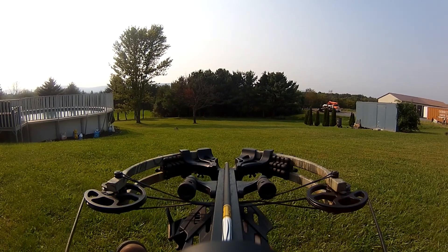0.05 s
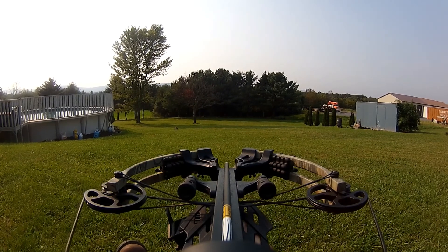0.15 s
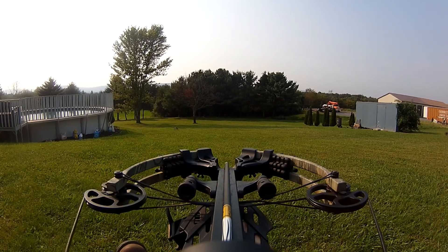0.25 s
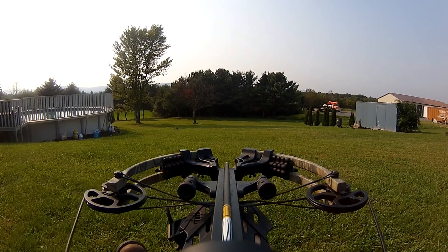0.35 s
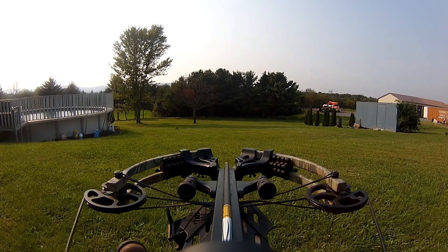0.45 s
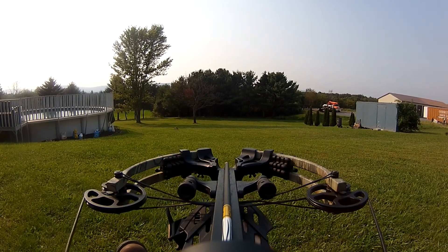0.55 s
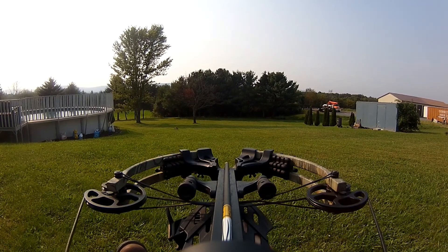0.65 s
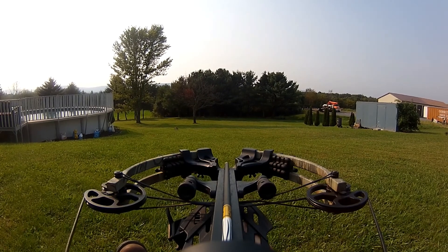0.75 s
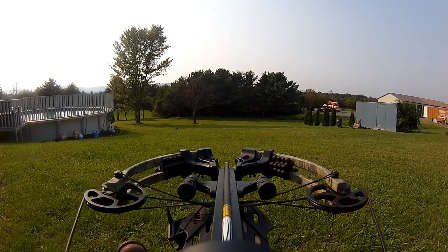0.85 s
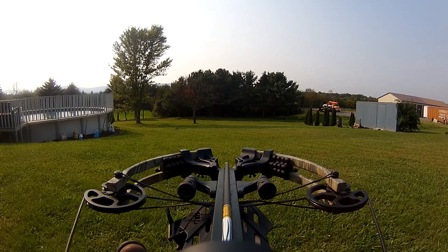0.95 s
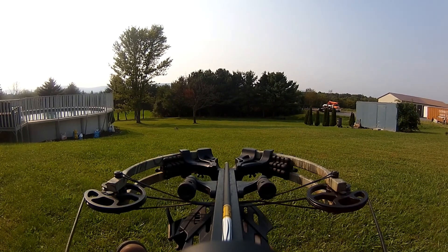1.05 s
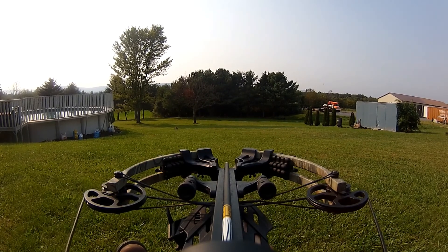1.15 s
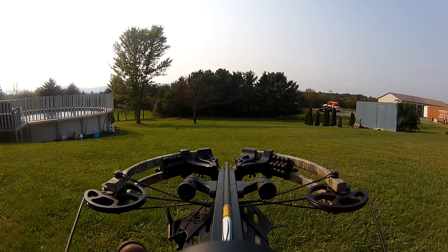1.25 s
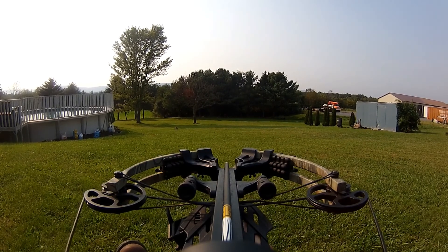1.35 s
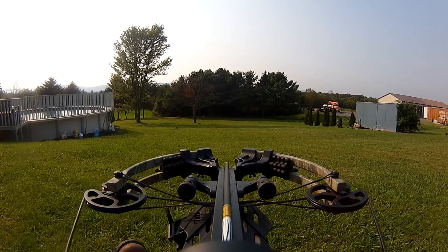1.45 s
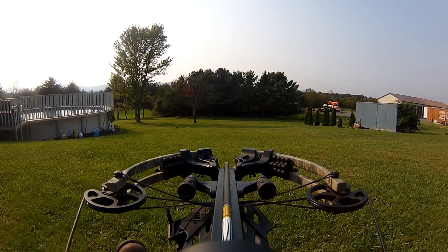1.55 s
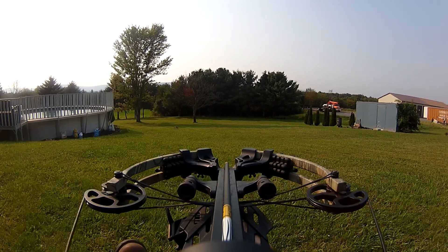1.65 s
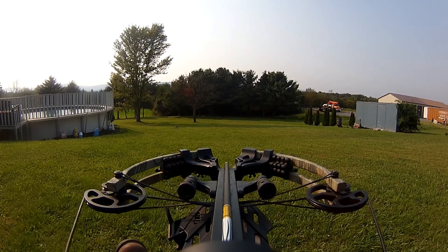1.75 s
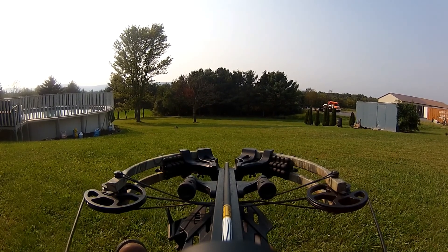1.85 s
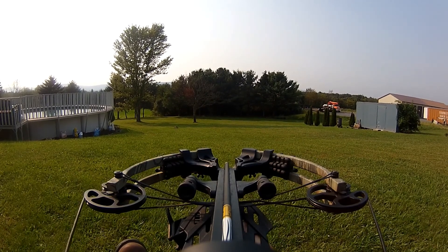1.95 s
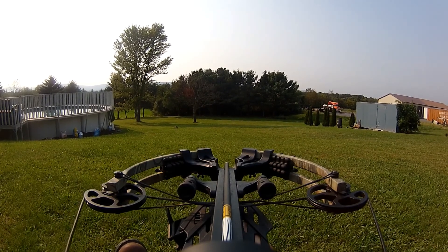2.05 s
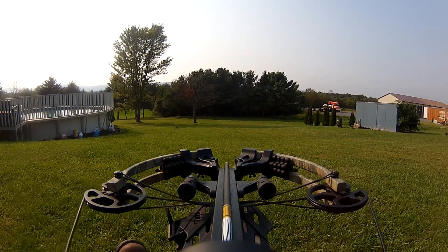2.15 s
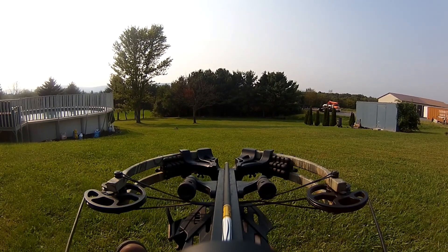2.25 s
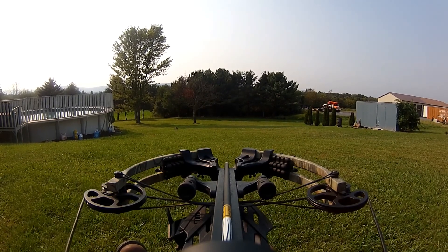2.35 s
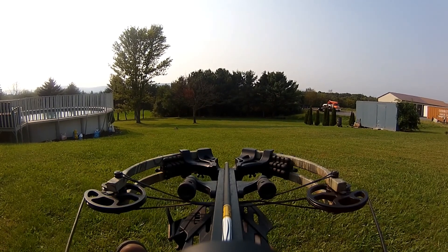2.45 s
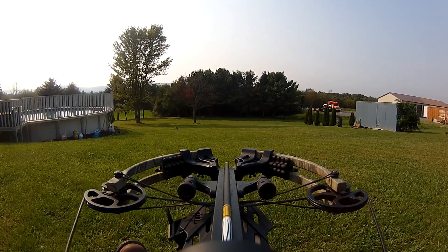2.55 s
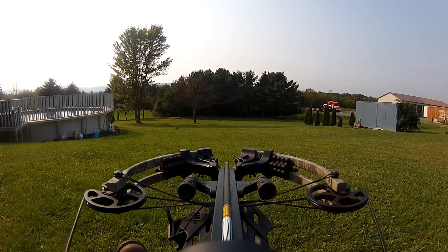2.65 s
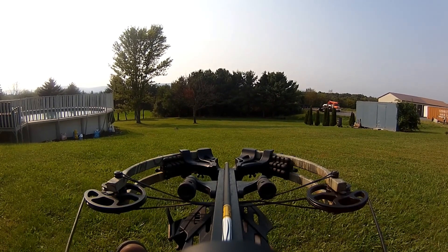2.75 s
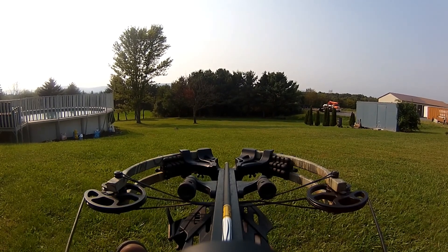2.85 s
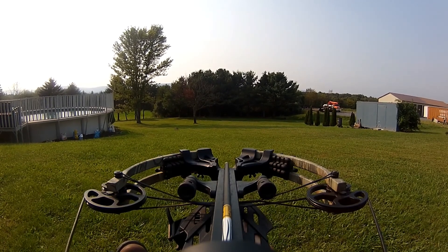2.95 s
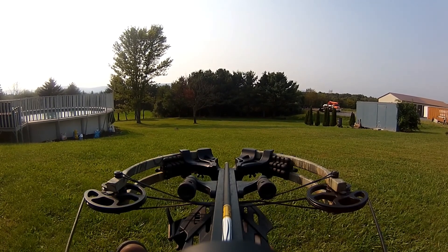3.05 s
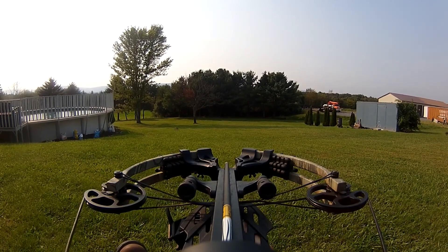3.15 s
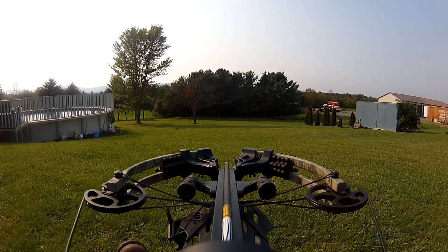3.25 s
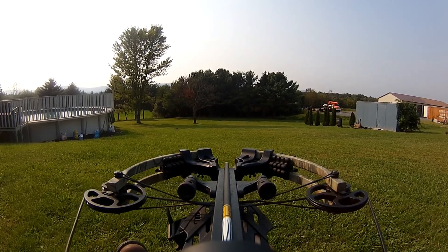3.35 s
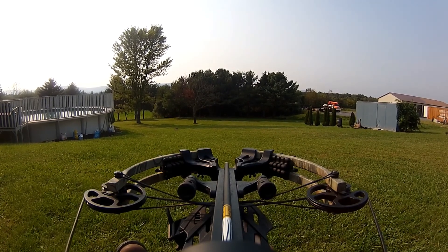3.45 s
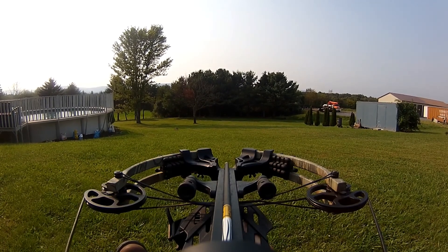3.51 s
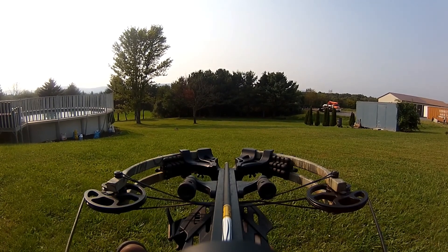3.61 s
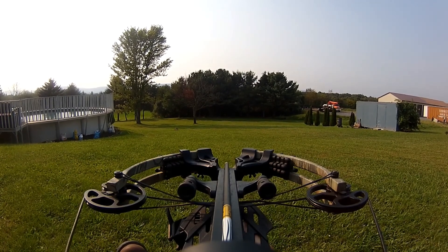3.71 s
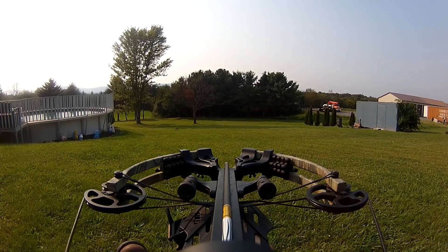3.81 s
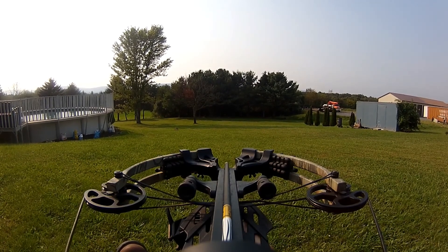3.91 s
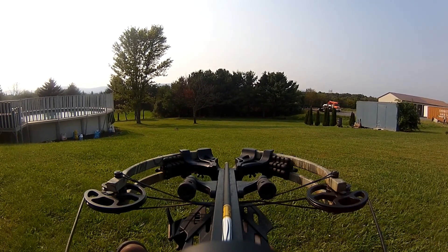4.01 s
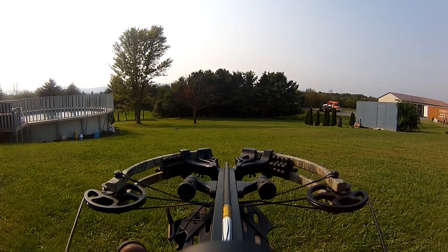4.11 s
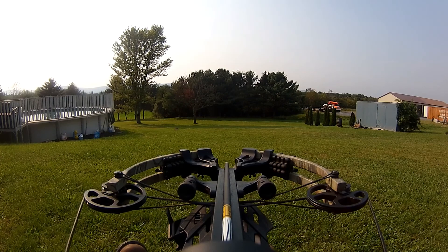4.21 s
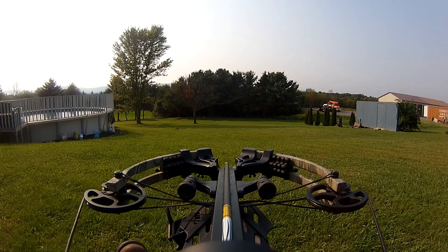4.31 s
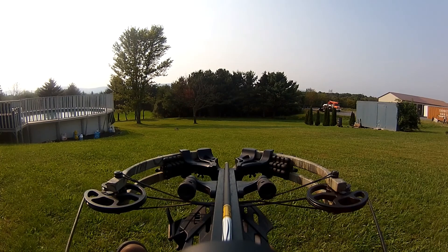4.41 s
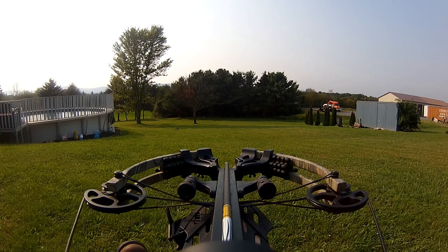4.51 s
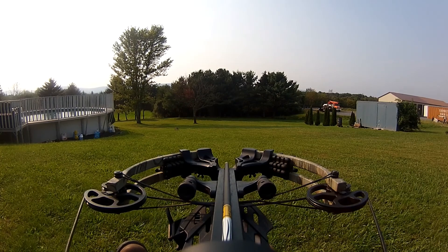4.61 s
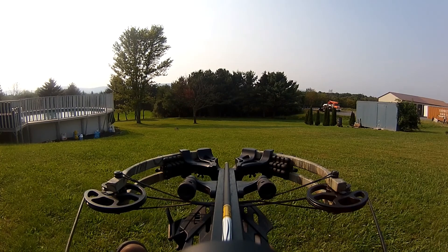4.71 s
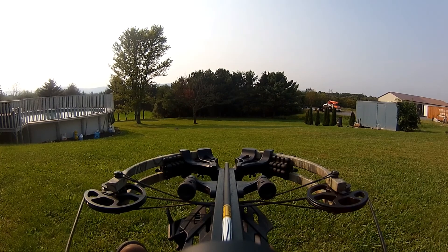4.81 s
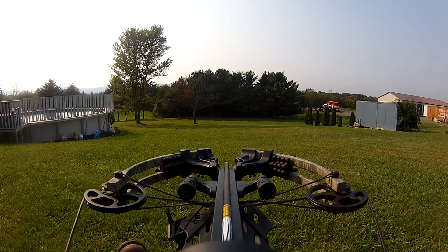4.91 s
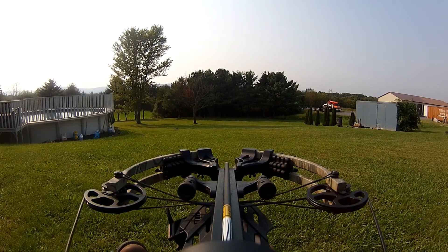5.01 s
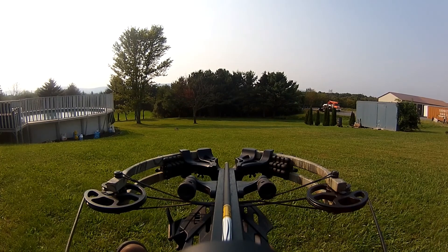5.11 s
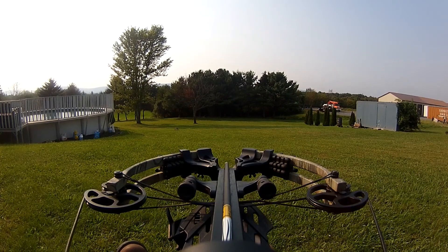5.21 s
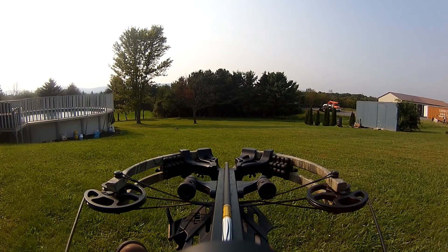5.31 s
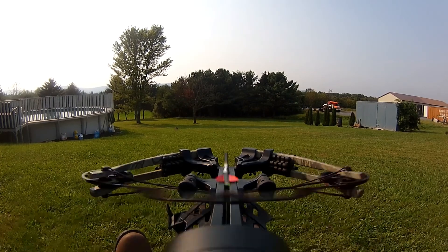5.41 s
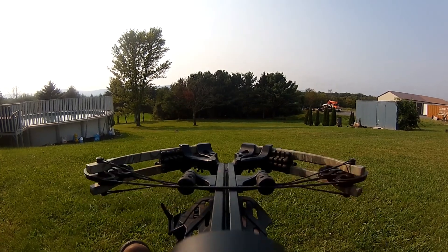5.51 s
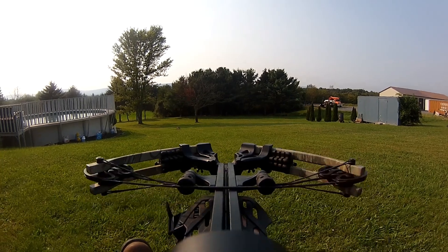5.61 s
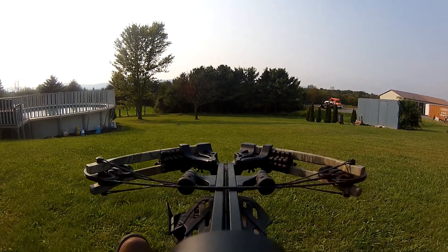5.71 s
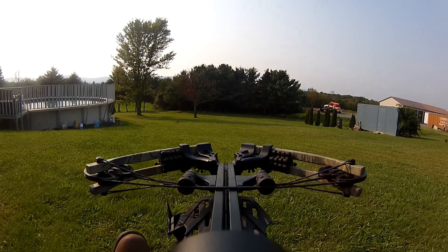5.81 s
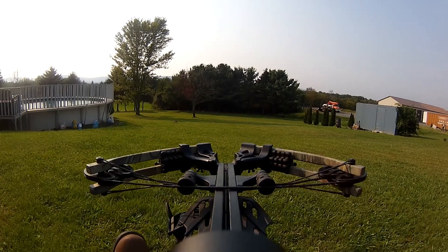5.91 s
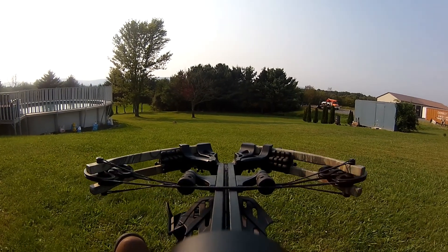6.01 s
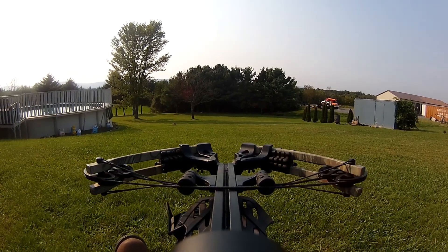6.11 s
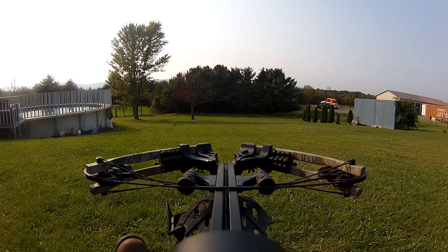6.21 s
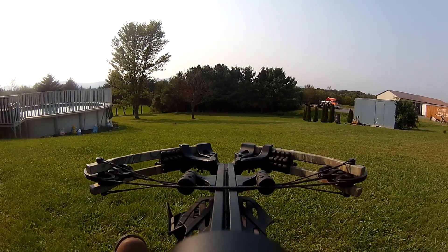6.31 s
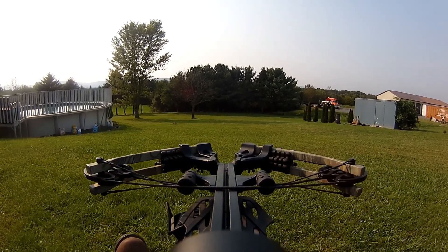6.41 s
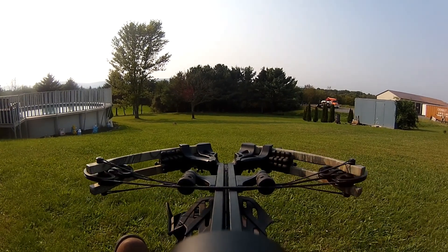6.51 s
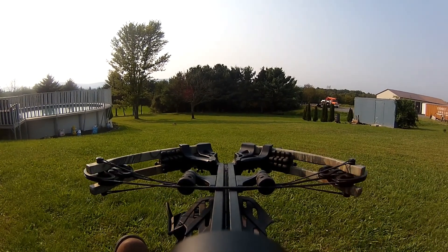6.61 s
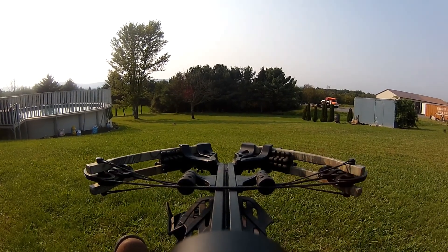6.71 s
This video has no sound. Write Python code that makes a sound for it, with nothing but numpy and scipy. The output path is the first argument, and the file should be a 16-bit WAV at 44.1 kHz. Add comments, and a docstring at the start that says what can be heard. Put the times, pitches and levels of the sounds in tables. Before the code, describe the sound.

Crickets chirp and wind gusts on the microphone, then a crossbow fires with a loud snap and brief ringing, followed by a faint distant hit.

```python
"""On a lawn, crickets chirp by stridulation and a far bird calls once; a breeze grows gusty, and its
eddies buffet the microphone of a small camera. At 5.4 s a compound crossbow is fired right in front
of it: the string slaps its stops and buzzes, and limbs and cams ring in damped modes. The limiter
ducks hard, so the ring swells as the gain recovers. At 6.1 s the bolt is heard striking a far target."""
import sys
import numpy as np
from scipy import signal
from scipy.fft import rfft, irfft, next_fast_len
from scipy.io import wavfile
from scipy.ndimage import uniform_filter1d

SR = 44100
rng = np.random.default_rng(int(sys.argv[2]) if len(sys.argv) > 2 else 0)


def transcribe(u):
    """Save the signal u as a 16-bit wav file named by the first command-line argument.

    u: samples, shape (n,) or (channels, n), limited to [-1, 1]; the rate is SR.
    q: integer samples, one column per channel.
    """
    v = np.clip(np.atleast_2d(u).T, -1, 1)
    q = np.round(v * 32767).astype(np.int16)
    wavfile.write(sys.argv[1], SR, q)


N = 298116
T = np.arange(N) / SR
STOP_S = 5.408  # the string reaches its stops

# normal modes of string, limbs and cams: (f/Hz, level/dB, t60/s, build-up/s)
BOW_MODES = [(107.3, 13, 0.26, .09), (151, -12.5, 0.43, .09), (210, 1, .215, .02), (325, 12.5, .17, .03),
             (410.4, -7, 0.64, 0.072), (528, -3, 0.22, .01), (624, -4, 0.15, .01), (740, -3, 0.21, .01),
             (803, -38, 0.65, .01), (820, -39.5, 0.51, .01), (919.5, -39, 1.49, .05), (1087, -6, 0.13, .01),
             (1180, -13.5, 0.15, .01), (1437, -42, 1.35, .05), (1780, -46.5, .6, 0.077),
             (2290, -39, 1.41, .05)]
STRING_HZ = BOW_MODES[0][0]
# crests of the gusts: (t/s, level/dB, length/s)
GUSTS = [(1.888, -34.5, 0.065), (1.995, -39, .04), (2.266, -36, .07), (2.724, -27.5, 0.084),
         (2.98, -36.5, 0.086), (3.082, -30.5, 0.061), (3.201, -40.5, 0.09), (3.533, -30, 0.057),
         (3.70, -40, 0.21), (4.192, -33, 0.12), (4.364, -48, 0.09), (4.60, -40.5, 0.033),
         (4.77, -39.5, 0.16), (5.767, -32, 0.036), (5.879, -34, 0.084), (5.98, -35.5, .06),
         (6.107, -43, 0.03)]


def snap(tail_db=23, tail_t60=.06):
    """Impact excitation: each blow cracks through the stock and thumps the limbs; the stock rings on."""
    # blows from latch to string stops: (t/s, crack level/dB, crack t60/s, thump level/dB)
    blows = [(5.3961, 35, 0.053, 24.5), (5.4015, 33, 0.095, 24), (5.4068, 42, .03, 55.5),
             (5.409, 55.5, 0.023, 42.5)]
    crack_spectrum = [(60, 2.5), (200, 0.5), (310, -9.5), (450, -3.5), (900, -8), (1500, -4.7),
                      (2100, -1.5), (3500, -3.7), (4600, 1.3), (5800, -1.5)]  # broad colour of the crack: (f/Hz, level/dB)
    stock_modes = [(657, 110, -5), (1200, 130, 3), (1785, 40, 7.5), (2095, 150, 7), (3255, 75, 7),
                   (4350, 60, 4), (4560, 88, 5.5), (5160, 140, 3.5)]  # resonances of stock and rail: (f/Hz, bandwidth/Hz, level/dB)
    limb_modes = [(215, -12.5, 0.021), (625, 0.5, 0.014)]  # heavily damped modes of the limbs: (f/Hz, level/dB, t60/s)
    crack = np.sqrt(sum((undb(db) * fade(s, t60)) ** 2 for s, db, t60, _ in blows))
    thump = sum(undb(db + mode_db) * fade(s, t60) * np.sin(2 * np.pi * hz * (T - s))
                for s, _, _, db in blows for hz, mode_db, t60 in limb_modes)
    tail = undb(tail_db) * fade(STOP_S, tail_t60)
    return crack * noise(crack_spectrum, stock_modes) + thump + tail * noise(peaks=stock_modes)


def ring():
    """Coupled vibration: the bow's modes take a moment to draw energy from the string, then decay."""
    age = np.maximum(T - STOP_S, 0)
    out = 0
    for hz, db, t60, build_s in BOW_MODES:
        build_up = 1 - np.exp(-(age / build_s) ** 3)
        out = out + undb(db) * fade(STOP_S, t60) * build_up * np.sin(2 * np.pi * hz * age)
    return out


def buzz(slap_db=24, slap_t60=0.22, sharpness=4.5, clear_s=5.503, clear_t60=.05, graze_db=-15):
    """Intermittent contact: the string slaps the rail twice a cycle, then grazes as its swing shrinks."""
    # colour of a slap: (f/Hz, level/dB)
    spectrum = [(150, -15.0), (600, 6.0), (1200, 2), (1600, -7), (2050, -3.5), (3200, -14), (5500, -16)]
    phase = (2 * STRING_HZ * (T - STOP_S)) % 1
    slaps = np.exp(-sharpness * phase)
    contact = (T < clear_s) + fade(clear_s, clear_t60) + undb(graze_db)
    return undb(slap_db) * fade(STOP_S, slap_t60) * contact * slaps * noise(spectrum)


def clicks(width_hz=550, broad_db=-13):
    """Small impacts excite resonances: the trigger breaks, then fittings chatter once a string period."""
    # single clicks of trigger and fittings: (t/s, level/dB, f/Hz, t60/s)
    singles = [(5.3744, -44, 5000, .02), (5.3752, -38.5, 2200, 0.036), (5.4407, 17, 4300, 0.0052),
               (5.593, -42, 2280, 0.034)]
    # rattles of loose fittings: (t/s, length/s, level/dB, growth/(dB/s), f/Hz, t60/s)
    rattles = [(5.4818, .024, 3, 120, 3850, 0.0071), (5.5117, .033, -12.5, -520, 5000, 0.021)]
    chatter = [(s + age, db + growth * age, hz, t60) for s, length, db, growth, hz, t60 in rattles
               for age in np.arange(0, length, 1 / STRING_HZ)]
    out = 0
    for s, db, hz, t60 in singles + chatter:
        grit = rng.standard_normal(N)
        resonance = signal.lfilter(*signal.iirpeak(hz, hz / width_hz, fs=SR), grit)
        out = out + undb(db) * fade(s, t60) * (unit(resonance) + undb(broad_db) * grit)
    return out


def target(scatter_db=-17, scatter_t60=0.26, knock_db=-36, knock_hz=290, knock_t60=0.062):
    """Damped impact: the bolt strikes far away with a dull knock; the yard scatters a short tail."""
    strike = (6.0765, -23, 0.0069)  # the bolt in the target: (t/s, level/dB, t60/s)
    spectrum = [(100, 5), (350, 3), (700, -6), (1100, -2), (1800, 6.5), (2600, -3.5), (3800, -3.5),
                (5500, 2.5)]  # colour of the strike: (f/Hz, level/dB)
    s, db, t60 = strike
    knock = undb(knock_db) * fade(s, knock_t60) * np.sin(2 * np.pi * knock_hz * (T - s))
    envelope = fade(s, t60) + undb(scatter_db) * fade(s, scatter_t60)
    return knock + undb(db) * envelope * noise(spectrum)


def yard(echo_db=-48, echo_t60=1.1):
    """Diffuse reflection: trees and sheds send back a faint wash of the shot."""
    # colour of the wash: (f/Hz, level/dB)
    spectrum = [(200, -9.5), (1200, -3), (1850, 9.0), (2600, -6.5), (5500, -1.0), (9000, -22.5)]
    return undb(echo_db) * fade(STOP_S, echo_t60) * noise(spectrum)


def wind(flutter_db=1.37, flutter_hz=16):
    """Turbulence: gusts add in power to a breeze; stronger wind has smaller, faster eddies."""
    breeze_curve = [(0, -51), (1.1, -51), (1.8, -45), (2.1, -46.5), (2.5, -38.5), (2.85, -45.5),
                    (4.95, -48), (5.25, -43), (6.2, -45.5), (6.45, -49), (6.76, -53.5)]  # breeze on the microphone: (t/s, level/dB)
    calm_spectrum = [(8, -20), (28, 4.5), (60, 3.5), (120, -3.5), (250, -26), (600, -44), (2000, -80)]  # rumble in calm air: (f/Hz, level/dB)
    gust_spectrum = [(8, -25), (30, 2), (70, 2.5), (130, 2), (215, -2), (295, -19.5), (600, -38),
                     (2000, -85)]  # rumble in a full gust: (f/Hz, level/dB)
    breeze = undb(np.interp(T, *np.transpose(breeze_curve)) + flutter_db * walk(flutter_hz))
    gust_power = sum(undb(db) ** 2 * np.exp(-(2 * (T - s) / length) ** 2) for s, db, length in GUSTS)
    level = np.sqrt(breeze ** 2 + gust_power)
    force = wind_force(20 * np.log10(level))
    rumble = (1 - force) * noise(calm_spectrum) + force * noise(gust_spectrum)
    running_rms = np.sqrt(uniform_filter1d(rumble ** 2, size=3500))
    return level * rumble / running_rms


def buffets(over_gust_db=5.5, calm_hz=55, gust_hz=130):
    """Eddy pressure: each gust's crest gives the microphone one smooth push between two dips."""
    out = 0
    for s, db, _ in GUSTS:
        hz = calm_hz + (gust_hz - calm_hz) * wind_force(db)
        u = (np.pi * hz * (T - s)) ** 2
        pulse = (1 - 2 * u) * np.exp(-np.minimum(u, 50))
        out = out + undb(db + over_gust_db) * pulse
    return out


def wind_force(db, calm_db=-39, full_gust_db=-29):
    """Linear map from wind level to share of a full gust, held between 0.15 and 1."""
    return np.clip((db - calm_db) / (full_gust_db - calm_db), .15, 1)


def cricket(chirps, pitch_hz, glide_hz, scrape_hz, stroke_s=0.053, open_s=.04, uneven_db=1, uneven_hz=20):
    """Stridulation: three uneven wing strokes make a chirp; the tone falls as each stroke slows."""
    progress = np.arange(int(open_s * SR)) / (open_s * SR)
    envelope, hz = np.zeros(N), np.full(N, float(pitch_hz))
    for s, db in chirps:
        for k, (push, detune) in enumerate(rng.standard_normal((3, 2))):
            at = int((s + k * stroke_s - open_s / 2) * SR) + np.arange(len(progress))
            inside = (at >= 0) & (at < N)
            envelope[at[inside]] = (undb(db + uneven_db * push) * np.sin(np.pi * progress))[inside]
            hz[at[inside]] = (pitch_hz + uneven_hz * detune - glide_hz * progress ** 2)[inside]
    return envelope * np.sin(2 * np.pi * np.cumsum(hz + scrape_hz * walk(500)) / SR)


def crickets(period_s=0.4, direct_db=-0.9, smear_db=-7.5):
    """Direct and diffuse sound: the near cricket arrives mostly straight, the far ones only scattered."""
    chirp_times = [0.114, .390, .684, .986, 1.286, 1.599, 1.975, 2.395, 2.685, 3.085, 3.453, 3.754, 4.214,
                   4.525, 4.785, 5.064, 5.345, 5.615, 5.888, 6.175, 6.477]  # first wing stroke of each near chirp: (t/s)
    loudness = [(0, -66), (.4, -62), (1.3, -61.5), (3.4, -63.5), (5.3, -63.5), (5.8, -58.5), (6.76, -59)]  # strength of the near cricket: (t/s, level/dB)
    far_voices = [(4170, -71), (4420, -71), (4720, -72), (5120, -72.5)]  # crickets further off: (f/Hz, level/dB)
    chirps = [(s, np.interp(s, *np.transpose(loudness))) for s in chirp_times]
    near = cricket(chirps, pitch_hz=4650, glide_hz=606, scrape_hz=120)
    far = 0
    for hz, db in far_voices:
        times = np.cumsum(period_s * rng.uniform(0.7, 1.2, 24)) - rng.uniform(period_s, 2 * period_s)
        far = far + cricket([(s, db) for s in times], pitch_hz=hz, glide_hz=260, scrape_hz=129)
    return undb(direct_db) * near + undb(smear_db) * scattered(near, t60=.2) + scattered(far, t60=.3)


def bird(rasp_hz=38, wet_db=-9):
    """Frequency modulation: a far, nasal cry arches, then jitters into a rasp of more equal harmonics."""
    contour = [(.03, 744, -76, 0.29), (.075, 776, -57, 0.18), (.11, 786, -54.5, 0.05),
               (.16, 783, -53.5, 0.14), (.21, 760, -62, 0.28), (.26, 759, -60, 1.02), (.30, 732, -70, .7),
               (.36, 743, -84, 0.46)]  # course of the cry: (t/s, fundamental f/Hz, level/dB, roughness)
    harmonics = [(3, -15, -9), (4, -4.5, -2), (5, -19, 2.5), (6, -9.5, -3), (7, -16, -6)]  # its partials: (multiple, clear level/dB, rasping level/dB)
    times, *columns = np.transpose(contour)
    hz, db, rough = (np.interp(T, times, column) for column in columns)
    phase = 2 * np.pi * np.cumsum(hz + rasp_hz * rough * walk(650)) / SR
    voice = sum(undb(clear + rough * (rasp - clear)) * np.sin(k * phase) for k, clear, rasp in harmonics)
    cry = (T < times[-1]) * undb(db) * voice
    return cry + undb(wet_db) * scattered(cry, t60=0.41)


def field(field_db=-56.1, flicker_db=.35, flicker_hz=2.99):
    """Incoherent addition: distant sources merge into a smooth hush."""
    spectrum = [(30, -2), (200, 2.5), (450, -4.5), (850, -7.5), (1600, -13), (3000, -18), (3900, -19.5),
                (4500, -17), (5000, -23.5), (5800, -22)]  # far countryside with its insect chorus: (f/Hz, level/dB)
    level = undb(field_db + flicker_db * walk(flicker_hz))
    return level * unit(lowpass(noise(spectrum), hz=7000, order=4))


def scattered(x, t60):
    """Multipath scattering: many weak paths through grass and trees smear a sound at equal power."""
    paths = fade(0, t60) * rng.standard_normal(N)
    return signal.fftconvolve(x, paths / np.linalg.norm(paths))[:N]


def undb(db):
    """Decibels to amplitude ratio."""
    return 10 ** (np.asarray(db) / 20)


def unit(x):
    """Normalisation to rms 1."""
    return x / np.sqrt(np.mean(x ** 2))


def fade(start, t60):
    """Exponential decay from a start time, by 60 dB in t60 seconds."""
    age = T - start
    return (age >= 0) * np.exp(-np.log(1000) * np.maximum(age, 0) / t60)


def walk(rate_hz):
    """Linear interpolation between random values, at rms 1."""
    knots = np.arange(0, T[-1] + 1, 1 / rate_hz)
    return unit(np.interp(T, knots, rng.standard_normal(len(knots))))


def noise(points=None, peaks=()):
    """Spectral shaping to rms 1: colour (f/Hz, level/dB), resonances (f/Hz, bandwidth/Hz, level/dB)."""
    size = next_fast_len(N)
    f = np.maximum(np.arange(size // 2 + 1) * SR / size, 1)
    power = sum(undb(db) ** 2 / (1 + (2 * (f - hz) / width) ** 2) for hz, width, db in peaks)
    if points is not None:
        hz, db = np.transpose(points)
        power = power + undb(np.interp(np.log(f), np.log(hz), db)) ** 2
    return unit(irfft(rfft(rng.standard_normal(size)) * np.sqrt(power), size)[:N])


def lowpass(x, hz, order):
    """Maximally flat low-pass filter."""
    return signal.sosfilt(signal.butter(order, hz, fs=SR, output="sos"), x)


def hold(x):
    """Spectral imaging: samples held in steps at 12 kHz mirror every sound faintly into the treble."""
    band = lowpass(x, hz=5550, order=14)
    samples = signal.resample_poly(band, 40, 147, window=("kaiser", 3))
    steps = np.repeat(samples, 4)  # now at 48 kHz
    return signal.resample_poly(steps, 147, 160)[:N]


def limiter(x, knee_db=-5, soft_db=3.5, release_db_per_s=285, attack_s=0.00076):
    """Gain control: the gain drops quickly by the excess over a soft knee and climbs back steadily."""
    power = uniform_filter1d(x ** 2, size=64, origin=16)
    level_db = 10 * np.log10(np.maximum(power, 1e-12))
    recovery = release_db_per_s * T
    excess_db = np.maximum.accumulate(level_db - knee_db + recovery) - recovery
    cut_db = soft_db * np.logaddexp(0, excess_db / soft_db)
    pole = np.exp(-1 / (attack_s * SR))
    return x * undb(-signal.lfilter([1 - pole], [1, -pole], cut_db))


def scene():
    """Superposition: the pressures of all sources add at the single microphone."""
    crossbow = snap() + ring() + buzz() + clicks()
    return (crossbow + target() + yard() + crickets() + bird() + wind() + buffets() + field())[None]


def record(dry, ceiling=0.89, top_hz=15500):
    """Saturation: the camera holds its samples, limits, clips what gets through and cuts the top."""
    clipped = ceiling * np.tanh(limiter(hold(dry[0])) / ceiling)
    return signal.sosfilt(signal.ellip(8, .2, 70, top_hz, fs=SR, output="sos"), clipped)[None]


dry = scene()
out = record(dry)
transcribe(out)
```